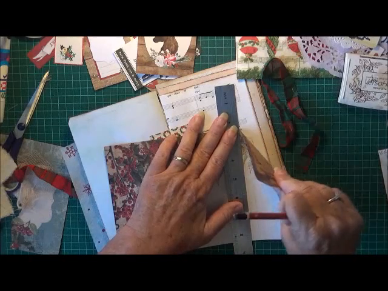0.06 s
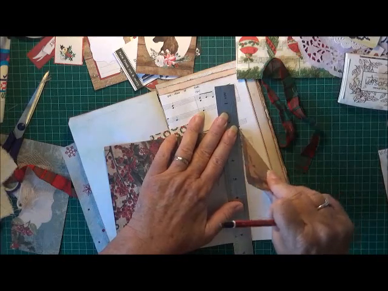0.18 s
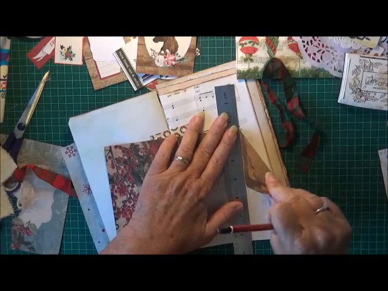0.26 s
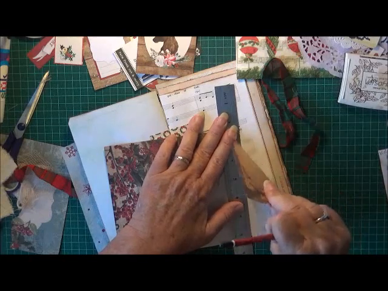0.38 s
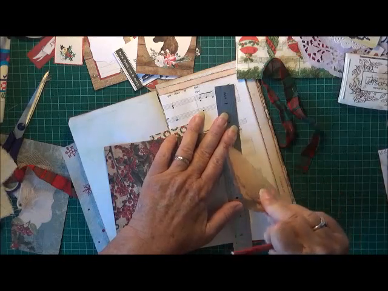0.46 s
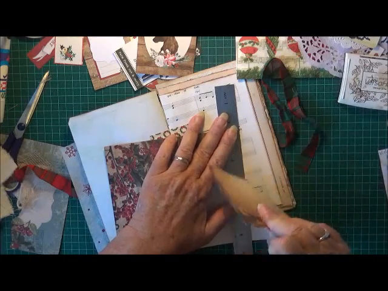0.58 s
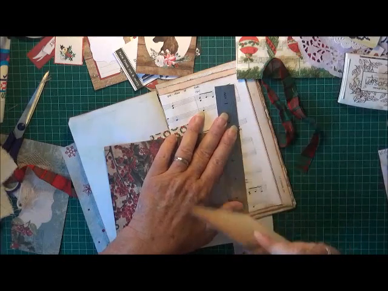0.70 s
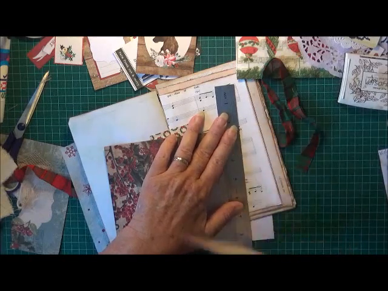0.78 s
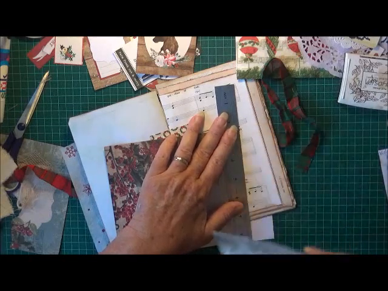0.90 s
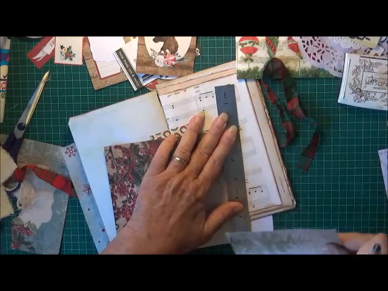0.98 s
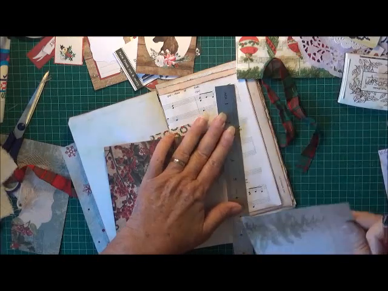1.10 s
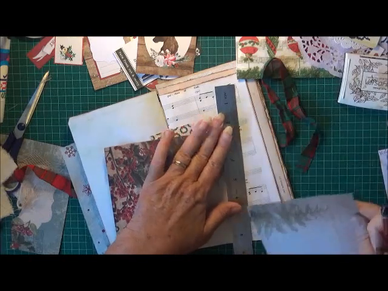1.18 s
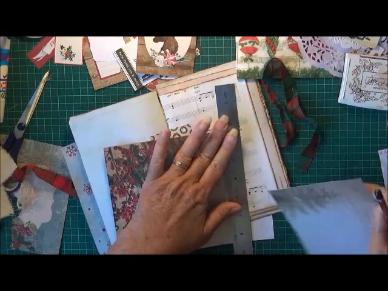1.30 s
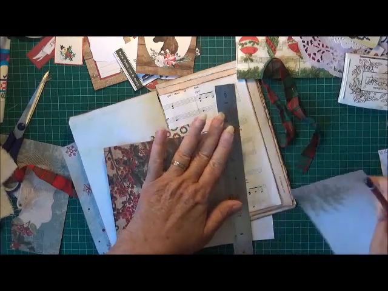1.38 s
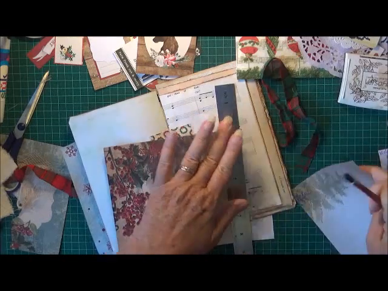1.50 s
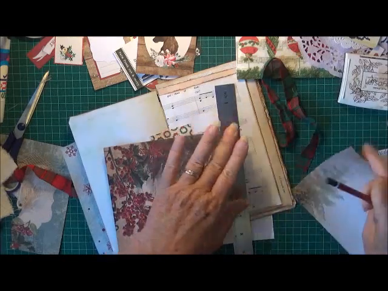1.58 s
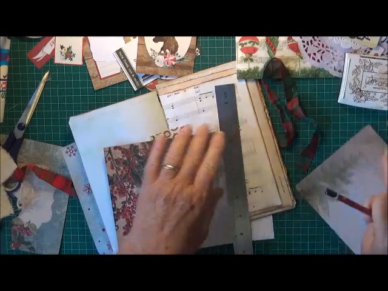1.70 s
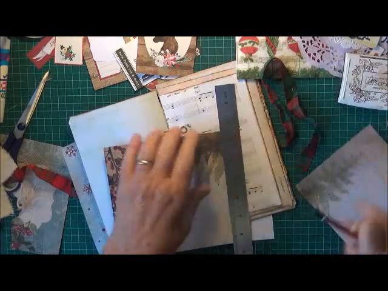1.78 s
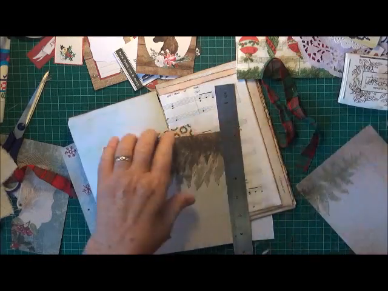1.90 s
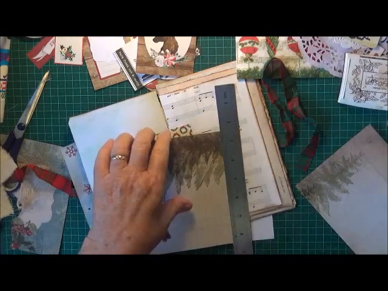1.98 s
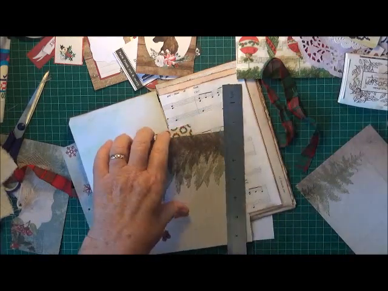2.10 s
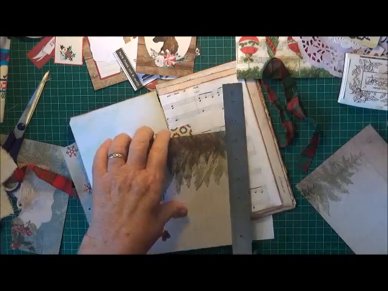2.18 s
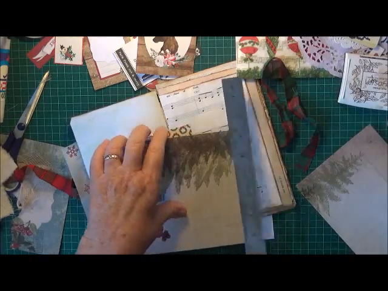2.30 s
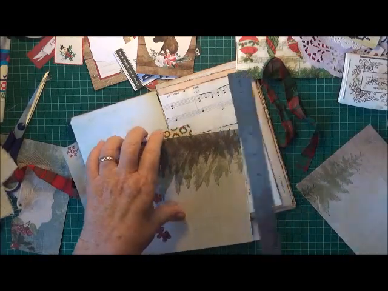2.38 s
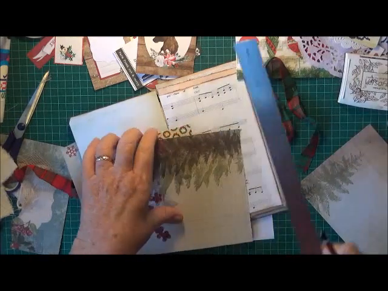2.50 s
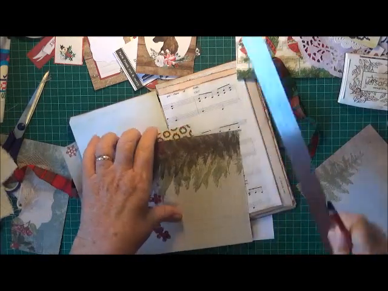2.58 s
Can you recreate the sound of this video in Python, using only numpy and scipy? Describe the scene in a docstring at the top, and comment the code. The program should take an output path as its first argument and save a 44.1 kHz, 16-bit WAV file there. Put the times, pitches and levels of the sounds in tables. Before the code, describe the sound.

Paper tears along a metal ruler in a brief catch and a longer dense rasp, the strip snaps free with a flap, then faint rustles and small ticks; close microphone, small quiet room.

```python
"""Quiet room noise and a faint pulsing whine, then a sheet of paper is torn along a metal ruler.
Craft table in a small room, microphone close: snapping fibres make a dense rasp that rings the strip.
The strip comes free with a flap (noise crack, falling sine, low thump) and flutters as coloured grains.
Soft rustles (grainy friction) and ticks (damped noise snaps) follow as it is laid aside and a hand brushes
the page; near the end the ruler scrapes in a narrow sinking resonance as it lifts, then one more soft rustle."""
import sys
import numpy as np
from scipy import signal
from scipy.fft import rfft, irfft
from scipy.io import wavfile
from scipy.ndimage import uniform_filter1d

SR = 44100
rng = np.random.default_rng(int(sys.argv[2]) if len(sys.argv) > 2 else 0)


def wrap_up_sound(samples):
    """Save the sound to the file named by the first command line argument, as 16-bit audio."""
    columns = np.atleast_2d(samples).T
    # keep every value between -1 and 1, then stretch to whole-number steps
    tamed = np.clip(columns, -1, 1)
    steps = np.round(tamed * 32767).astype(np.int16)
    wavfile.write(sys.argv[1], SR, steps)


N = 114660
T = np.arange(N) / SR
CUTOFF_HZ = 11150  # upper band limit of the recorder

# Spectra give relative density; colour() evens out their overall power.
# Source levels are dry: before the room and the common paper gain in scene().

# Room noise. Columns: f/Hz, density/dB
FLOOR_SPECTRUM = [(28, -22), (48, 8), (75, -4), (250, -5), (700, -12), (1600, -15.5), (2500, -19.5),
                  (6000, -21), (11200, -24.5)]
# Side signal of the room noise relative to its mid. Columns: f/Hz, gain/dB
FLOOR_SIDE_GAIN = [(60, -17), (200, -10.5), (500, -4), (1200, -0.5), (9000, -6.5)]
FLOOR_MID_DB = -59.5
# Low handling rumble on the table. Columns: t/s, level/dB
RUMBLE_LEVEL = [(0, -69), (.19, -68), (.85, -57.5), (1.25, -63), (1.76, -60), (2.6, -70)]
# Spectrum of that rumble. Columns: f/Hz, density/dB
RUMBLE_SPECTRUM = [(30, -13.5), (90, 4.5), (480, -7), (2000, -48.5)]
# Faint passing tone. Columns: t/s, mean rms level/dB
TONE_LEVEL = [(0.92, -66), (1.07, -58), (1.25, -60), (1.33, -61)]
TONE_HZ, TONE_WAVER_HZ = 347, 8.6
# Faint electrical pulsing in the microphone: peak level, Gaussian half length, pulse rate
WHINE_HZ, WHINE_PEAK_DB, WHINE_HALF_S = 3248, -60.5, 0.0023
WHINE_PER_S, WHINE_FIRST_S = 25, .004

# The rip. Columns: t/s, treble level/dB, body level/dB
TEAR_LEVELS = [(.2135, -68, -78), (.217, -33.5, -31), (.235, -42, -35.5), (.248, -36, -31),
               (.29, -35.5, -35.5), (.32, -42, -36.5), (.357, -42, -44), (.361, -32, -39.5),
               (.374, -43.5, -42.5), (.399, -33.5, -39), (.405, -28.5, -33), (.46, -32.5, -33.5),
               (.53, -27.5, -29), (.62, -29.5, -31), (.694, -30, -34), (.702, -54, -35), (.73, -52, -48)]
# Bright part of the snapping fibres. Columns: f/Hz, density/dB
TREBLE_SPECTRUM = [(1500, -20.5), (2600, -9.5), (3300, -2.5), (4500, 1), (5400, -3.5), (6600, -1.5),
                   (8500, 0.5), (10000, -2.5), (11200, -5)]
# Fuller part of the rip. Columns: f/Hz, density/dB
BODY_SPECTRUM = [(40, -38), (90, -5), (170, -6), (280, -8.5), (420, -5.5), (680, -6.5), (850, -1.5),
                 (1300, 2), (2100, 0), (2700, 2), (4000, -23)]
SNAPS_PER_S, SNAP_SPREAD_DB, SNAP_RING_S = 6000, 3.5, 0.00019
# Resonances that come and go as the strip bends.
# Columns: middle t/s, half length/s, f/Hz, width/Hz, gain of the added ring/dB
STRIP_BENDS = [(0.226, 0.019, 7420, 910, 4), (0.243, 0.021, 9000, 804, 8.5), (0.264, 0.019, 870, 90, 6),
               (0.26, 0.06, 244, 66, 10.5), (0.377, 0.022, 480, 298, 15.5), (0.418, 0.073, 245, 60, 14.5),
               (0.483, 0.043, 2060, 199, 9), (0.532, 0.026, 3750, 590, 1.5), (0.627, 0.043, 800, 120, 14),
               (0.669, 0.027, 6780, 700, 4)]
# Patches of shifting paper colour: depth before levelling, span in frequency and time
PATCH_DB, PATCH_HZ, PATCH_S = 3.5, 260, 0.041

# The strip whips as the tear catches and as it comes free.
# Columns: t/s, crack level/dB, sweep level/dB, thump level/dB
STRIP_FLAPS = [(0.3605, -29.5, -42, -34), (.705, -19.5, -22.5, -24), (0.728, -26, -27.5, -31.5)]
CRACK_DECAY_S = 0.0031
SWEEP_FROM_HZ, SWEEP_TO_HZ, SWEEP_S, SWEEP_ROUGHNESS = 2700, 530, 0.00418, 0.59
THUMP_HZ, THUMP_DELAY_S, THUMP_DECAY_S = 245, 0.00562, 0.0041
# The strip flutters in the air. Columns: t/s, level/dB
FLUTTER_LEVEL = [(.7, -56), (.712, -36), (.742, -37.5), (.757, -33.5), (.773, -34.5), (.787, -44),
                 (.87, -71)]
# Spectrum of the flutter. Columns: f/Hz, density/dB
FLUTTER_SPECTRUM = [(40, -19), (85, 3), (220, 8), (400, 6.5), (700, 6), (1100, 2.5), (1700, 3.5),
                    (2300, -6), (4000, -14.5), (11000, -52)]

# Creases and edges tick. Columns: t/s, level/dB, f/Hz, width of each filter pass/Hz, decay/s
PAPER_TICKS = [(0.765, -38, 7500, 4000, 0.0012), (1.017, -32, 6800, 6030, 0.00034),
               (1.018, -31, 4230, 6200, 0.0007), (1.3222, -39, 1000, 600, 0.0025),
               (1.3555, -39, 2600, 6100, 0.0015), (1.355, -42.5, 920, 695, 0.013),
               (1.388, -42, 2360, 1300, 0.005), (1.5273, -29, 2700, 850, 0.0025),
               (1.528, -40, 1310, 1290, 0.016), (1.7945, -38.5, 3400, 6700, 0.0022),
               (2.3666, -46.5, 2980, 5070, 0.00093)]
TICK_RISE_SHARE = 0.14  # rise time constant as a share of the decay

# Paper and hand sliding.
# Columns: start t/s, rise/s, hold/s, release (time to fall 20 dB)/s, rub level/dB, hiss level/dB
SLIDING_STROKES = [(0.938, 0.038, 0.04, 0.027, -62.5, -55), (1.016, 0.036, 0.095, 0.24, -64.5, -56),
                   (1.213, 0.0089, 0.014, 0.36, -54, -59), (1.308, 0.011, 0.028, 0.13, -50.5, -54.5),
                   (1.353, 0.0037, 0.0041, 0.011, -57, -43), (1.366, 0.012, 0.0083, 0.11, -46, -54.5),
                   (1.4, 0.094, 0.024, 0.035, -51, -54), (1.52, 0.0061, 0.005, 0.06, -43.5, -45.5),
                   (1.792, 0.009, 0.0083, 0.054, -45.5, -51.5), (1.914, 0.0022, 0.0024, 0.026, -57, -53.5),
                   (1.949, 0.011, 0.036, 0.054, -49.5, -44.5), (2.033, 0.026, 0.22, 0.11, -68.5, -66),
                   (2.36, 0.01, 0.043, 0.023, -61, -63.5), (2.444, 0.045, 0.082, 0.019, -61.5, -57)]
# Dull part of the friction. Columns: f/Hz, density/dB
RUB_SPECTRUM = [(150, -4), (550, -9.5), (850, -5.5), (1200, -3), (2000, 1), (2800, -1), (4200, -4.5),
                (7000, -27.5)]
# Bright part of the friction. Columns: f/Hz, density/dB
HISS_SPECTRUM = [(1200, -10.5), (3000, -16), (4500, 0), (6500, 0), (8000, -3), (9800, 1), (11200, -8)]
RUB_GRAINS_PER_S, RUB_SPREAD_DB, RUB_CLUMP_DB, CLUMP_HZ = 9000, 3, 1.5, 318

# The ruler scrapes as it is lifted
SCRAPE_START_S, SCRAPE_LENGTH_S, SCRAPE_DB = 2.376, .054, -57
SCRAPE_FROM_HZ, SCRAPE_TO_HZ, SCRAPE_HALF_WIDTH_HZ = 1250, 952, 220

# Decay of the room. Columns: f/Hz, t60/s
ROOM_DECAY = [(150, 0.5), (1000, 0.31), (4000, 0.2), (11000, 0.2646)]
# Diffuse tail of the room. Columns: f/Hz, level/dB
ECHO_LEVEL = [(100, -60), (400, -4.5), (1500, -9.5), (9000, -7)]
EARLY_DB, EARLY_DECAY_S = -7.5, 0.0066


def amp(db):
    """Decibels to gain."""
    return 10 ** (np.asarray(db) / 20)


def unit(x):
    """Scales to an rms of one."""
    return x / np.sqrt(np.mean(x ** 2) + 1e-20)


def at_hz(points, hz):
    """Reads a spectrum on a log-frequency axis."""
    f, value = np.transpose(points)
    return np.interp(np.log(hz + 1), np.log(f + 1), value)


def level(rows, axis=1):
    """Gain over time from one column of a dB curve, practically silent outside it."""
    rows = np.array(rows)
    return amp(np.interp(T, rows[:, 0], rows[:, axis], left=-150, right=-150))


def colour(x, points):
    """Causal minimum-phase filter with the given spectrum; keeps white noise power below the cutoff."""
    size = 4096
    hz = abs(np.fft.fftfreq(size, 1 / SR))
    gain = amp(at_hz(points, hz))
    response = np.exp(np.conj(signal.hilbert(np.log(gain))))
    taps = np.fft.ifft(response).real[:size // 2]
    power = np.mean(gain ** 2 * (hz < CUTOFF_HZ))
    return signal.fftconvolve(x, taps)[:len(x)] / np.sqrt(power)


def resonate(x, hz, width):
    """One resonance with a peak gain of one."""
    b, a = signal.iirpeak(min(hz, SR / 3), hz / min(width, SR / 4), SR)
    return signal.lfilter(b, a, x)


def wander(hz):
    """Random drift that fades out above a rate, rms one."""
    rates = np.fft.rfftfreq(N, 1 / SR)
    return unit(irfft(rfft(rng.standard_normal(N)) / (1 + (rates / hz) ** 4), N))


def grains(per_s, spread_db):
    """Random clicks of uneven size, rms one."""
    sizes = amp(spread_db * np.minimum(rng.exponential(1, N), 4))
    signs = rng.choice([-1, 1], N)
    return unit(sizes * signs * (rng.random(N) < per_s / SR))


def decay(start, seconds):
    """Sudden start and exponential fall."""
    return (T >= start) * np.exp(-np.maximum(T - start, 0) / seconds)


def background():
    """Wide room noise, with centred handling rumble, a passing tone and a pulsing electrical whine."""
    mid, side = (colour(rng.standard_normal(N), FLOOR_SPECTRUM) for _ in range(2))
    side_gain = amp(at_hz(FLOOR_SIDE_GAIN, np.fft.rfftfreq(N, 1 / SR)))
    side = irfft(rfft(side) * side_gain, N)
    floor = amp(FLOOR_MID_DB) * (mid + np.array([side, -side]))
    rumble = level(RUMBLE_LEVEL) * colour(rng.standard_normal(N), RUMBLE_SPECTRUM)
    # sqrt(2) turns the sine's rms level into its peak
    tone_gain = np.sqrt(2) * level(TONE_LEVEL) * amp(wander(TONE_WAVER_HZ))
    tone = tone_gain * np.sin(2 * np.pi * TONE_HZ * T)
    # Time from the nearest pulse centre
    offset = (((T - WHINE_FIRST_S) * WHINE_PER_S + .5) % 1 - .5) / WHINE_PER_S
    pulses = np.exp(-(offset / WHINE_HALF_S) ** 2)
    whine = amp(WHINE_PEAK_DB) * pulses * np.sin(2 * np.pi * WHINE_HZ * T)
    return floor + tone + rumble + whine


def fibres():
    """Each breaking fibre is a tiny ping at one of 28 pitches spread over the band, rms one."""
    t = T[:SR // 100]
    ping = t / SNAP_RING_S * np.exp(-t / SNAP_RING_S)
    pitches = np.linspace(0, CUTOFF_HZ, 28)
    out = np.zeros(N)
    for hz in pitches:
        snaps = grains(SNAPS_PER_S / len(pitches), SNAP_SPREAD_DB)
        ring = ping * np.cos(2 * np.pi * (hz * t + rng.random()))
        out += signal.oaconvolve(snaps, ring)[:N]
    return unit(out)


def flex(x):
    """The paper's colour shifts in random patches of time and frequency as it bends."""
    size, hop = 512, 128
    z = signal.stft(x, nperseg=size, noverlap=size - hop)[2]
    field = rng.standard_normal(z.shape)
    for axis, span in enumerate([PATCH_HZ * size / SR, PATCH_S * SR / hop]):
        field = uniform_filter1d(field, max(round(span), 1), axis=axis)
    gain = unit(amp(PATCH_DB * unit(field)))
    return signal.istft(z * gain, nperseg=size, noverlap=size - hop)[1][:N]


def tear():
    """Fibres snap in a crisp crackle over a dense rasp; the bending strip rings with them."""
    treble = colour(fibres() * level(TEAR_LEVELS, axis=1), TREBLE_SPECTRUM)
    snaps = grains(SNAPS_PER_S, SNAP_SPREAD_DB)
    body = colour(snaps * level(TEAR_LEVELS, axis=2), BODY_SPECTRUM)
    rip = flex(treble + body)
    out = rip.copy()
    for middle, half, hz, width, db in STRIP_BENDS:
        swell = np.exp(-((T - middle) / half) ** 2)
        out += amp(db) * swell * resonate(rip, hz, width)
    return out


def flaps():
    """The strip whips: a crack, a bending wave whose highs arrive first, a low thump; it also flutters."""
    flutter = grains(RUB_GRAINS_PER_S, RUB_SPREAD_DB) * level(FLUTTER_LEVEL)
    out = colour(flutter, FLUTTER_SPECTRUM)
    for s, crack_db, sweep_db, thump_db in STRIP_FLAPS:
        age = np.maximum(T - s, 0) / SWEEP_S
        hz = SWEEP_TO_HZ + (SWEEP_FROM_HZ - SWEEP_TO_HZ) * np.exp(-age)
        wave = np.sin(2 * np.pi * np.cumsum(hz * (T >= s)) / SR)
        wave += SWEEP_ROUGHNESS * colour(rng.standard_normal(N), FLUTTER_SPECTRUM)
        # The sweep's swell peaks at an age of one
        out += amp(sweep_db) * wave * age * np.exp((1 - age ** 2) / 2)
        out += amp(crack_db) * rng.standard_normal(N) * decay(s, CRACK_DECAY_S)
        late = np.maximum(T - s - THUMP_DELAY_S, 0)
        swell = late / THUMP_DECAY_S * np.exp(1 - late / THUMP_DECAY_S)
        out += amp(thump_db) * np.sin(2 * np.pi * THUMP_HZ * late) * swell
    return out


def ticks():
    """Short damped snaps of the paper, each a quick swell through one broad resonance."""
    out = np.zeros(N)
    for s, db, hz, width, seconds in PAPER_TICKS:
        shape = decay(s, seconds) - decay(s, seconds * TICK_RISE_SHARE)
        shape = shape / abs(shape).max()
        snap = rng.standard_normal(N) * shape
        snap = resonate(resonate(snap, hz, width), hz, width)
        # Energy set to that of a decaying noise burst at the listed level
        out += amp(db) * snap * np.sqrt(seconds * SR / 2) / np.linalg.norm(snap)
    return out


def rustles():
    """Each stroke is fine friction with a dull rub and a bright hiss; overlapping powers add."""
    rub_power, hiss_power = np.zeros(N), np.zeros(N)
    for s, rise, hold, release, rub_db, hiss_db in SLIDING_STROKES:
        fall = amp(-20 * np.maximum(T - s - rise - hold, 0) / release)
        shape = np.clip((T - s) / rise, 0, 1) * fall
        rub_power += (shape * amp(rub_db)) ** 2
        hiss_power += (shape * amp(hiss_db)) ** 2
    clumps = unit(amp(RUB_CLUMP_DB * wander(CLUMP_HZ)))
    friction = np.zeros(N)
    for power, spectrum in [(rub_power, RUB_SPECTRUM), (hiss_power, HISS_SPECTRUM)]:
        rubbing = grains(RUB_GRAINS_PER_S, RUB_SPREAD_DB) * clumps
        friction += colour(rubbing * np.sqrt(power), spectrum)
    return flex(friction)


def ruler():
    """The ruler's edge scrapes the page as it lifts: friction in a narrow resonance that sinks."""
    progress = np.clip((T - SCRAPE_START_S) / SCRAPE_LENGTH_S, 0, 1)
    hz = SCRAPE_FROM_HZ + (SCRAPE_TO_HZ - SCRAPE_FROM_HZ) * progress
    # Slow complex noise carried on the gliding pitch makes a narrow band
    noise = wander(SCRAPE_HALF_WIDTH_HZ) + 1j * wander(SCRAPE_HALF_WIDTH_HZ)
    ring = noise * np.exp(2j * np.pi * np.cumsum(hz) / SR)
    return amp(SCRAPE_DB) * np.sqrt(abs(np.sin(np.pi * progress))) * ring.real


def room(x):
    """Early echoes off the table and shelves, alike in both ears, then a short diffuse stereo tail."""
    t = T[:SR // 2]
    late = t > .002
    early = rng.standard_normal(len(t)) * late * np.exp(-t / EARLY_DECAY_S)
    early = early / np.linalg.norm(early)
    near = x + amp(EARLY_DB) * signal.fftconvolve(x, early)[:N]
    hz, times, z = signal.stft(rng.standard_normal((2, len(t))), SR, nperseg=256)
    t60 = at_hz(ROOM_DECAY, hz)[:, None]
    fall_db = at_hz(ECHO_LEVEL, hz)[:, None] - 60 * times / t60
    # Keeps the echo energy independent of the decay time
    z = z * amp(fall_db) * np.sqrt(2 * np.log(1000) / (t60 * SR))
    tail = signal.istft(z, SR, nperseg=256)[1][:, :len(t)] * late
    return near + signal.fftconvolve(x[None], tail, axes=1)[:, :N]


def scene():
    """All the paper sounds, nearly centred, in the room, over the background."""
    paper_db, left_db = -1, .3
    paper = room(tear() + flaps() + rustles() + ticks() + ruler())
    balance = amp([[paper_db + left_db], [paper_db - left_db]])
    return paper * balance + background()


def record(dry):
    """The recorder's steep band limit, a linear-phase low-pass."""
    taps = signal.firwin(511, CUTOFF_HZ, window=("kaiser", 8), fs=SR)
    return signal.oaconvolve(dry, taps[None], "same")


dry = scene()
out = record(dry)
wrap_up_sound(out)
```